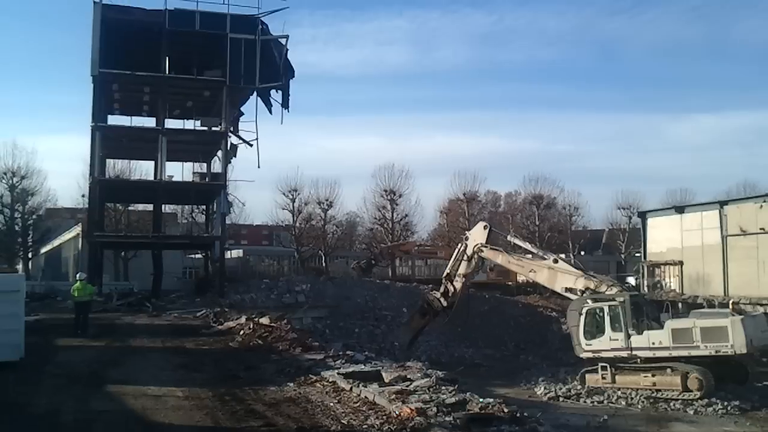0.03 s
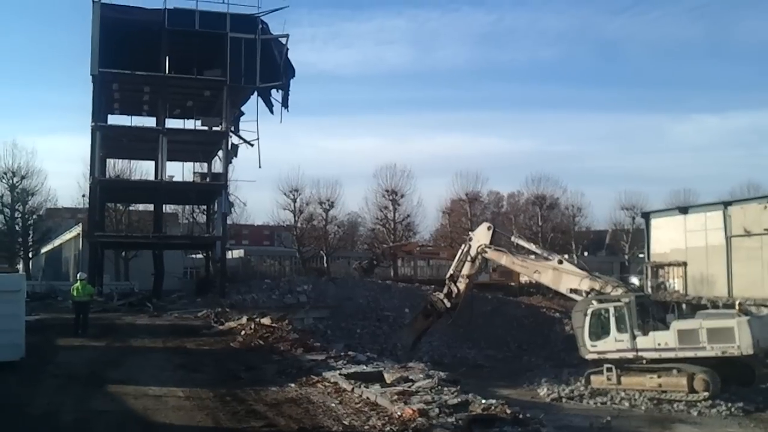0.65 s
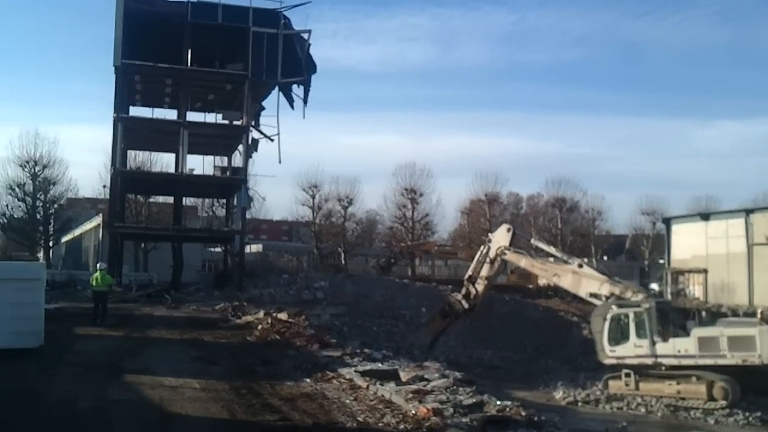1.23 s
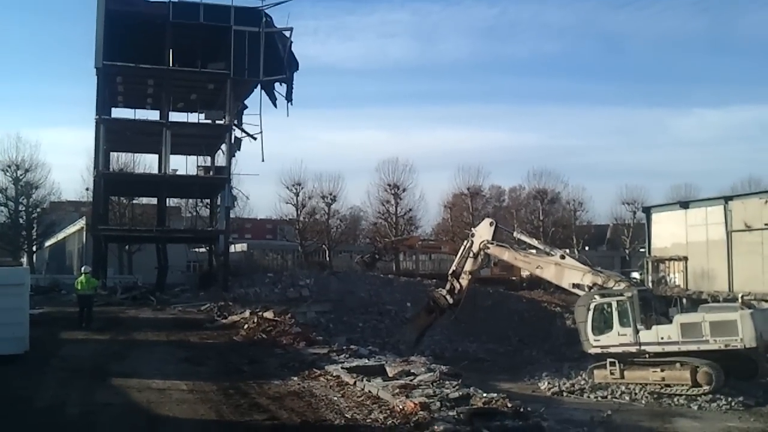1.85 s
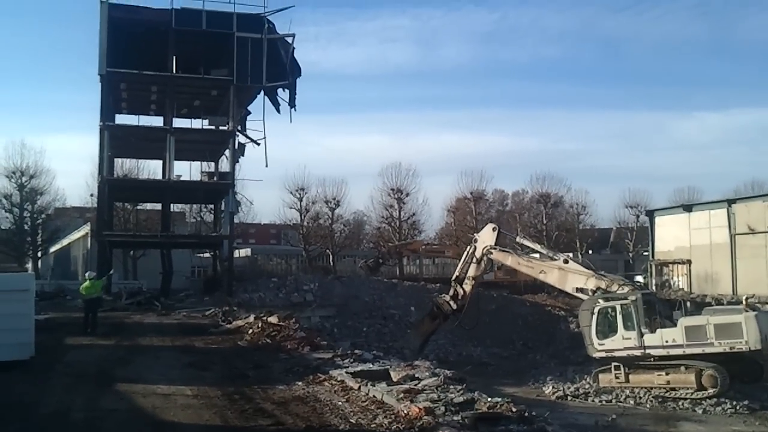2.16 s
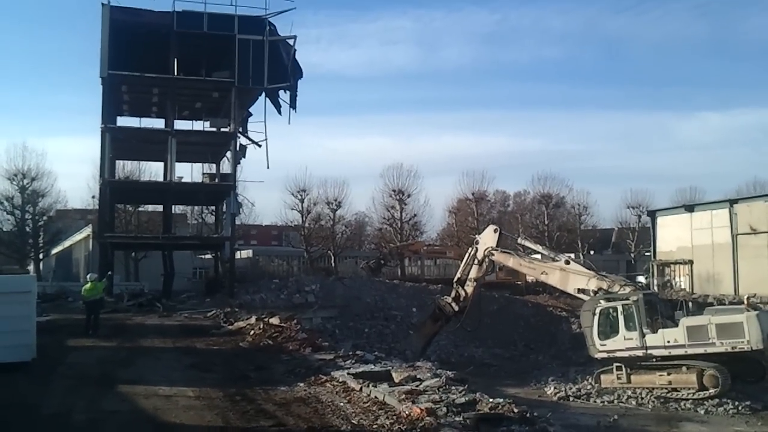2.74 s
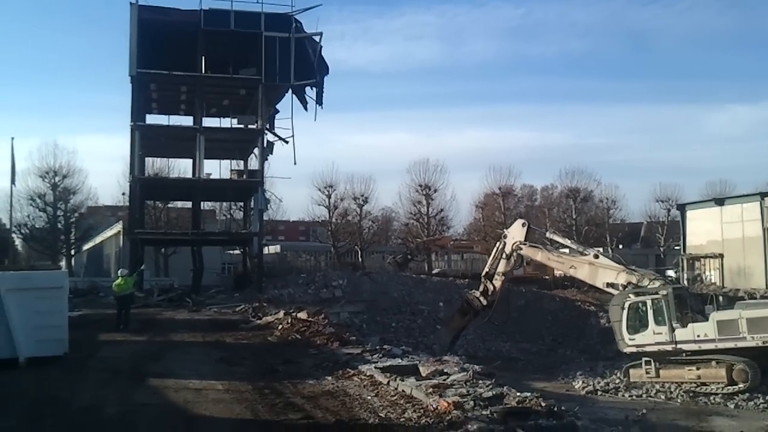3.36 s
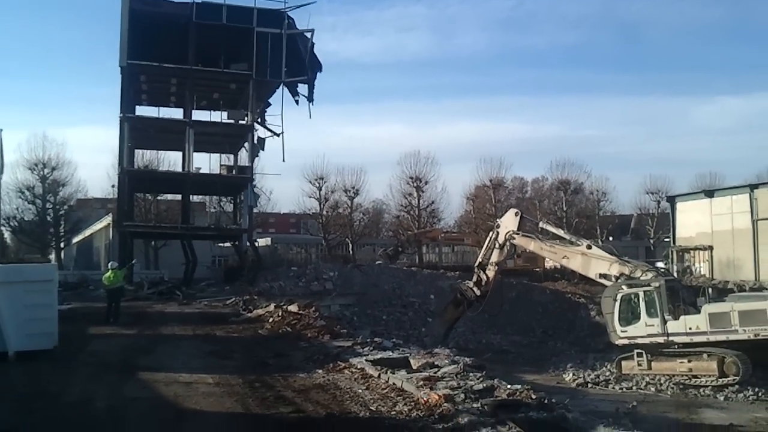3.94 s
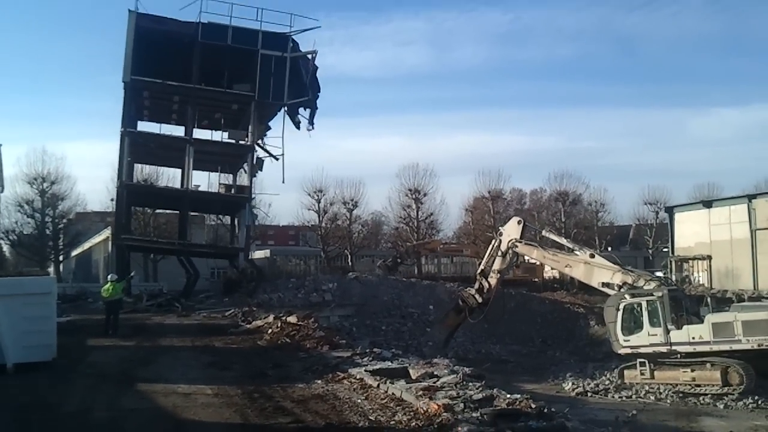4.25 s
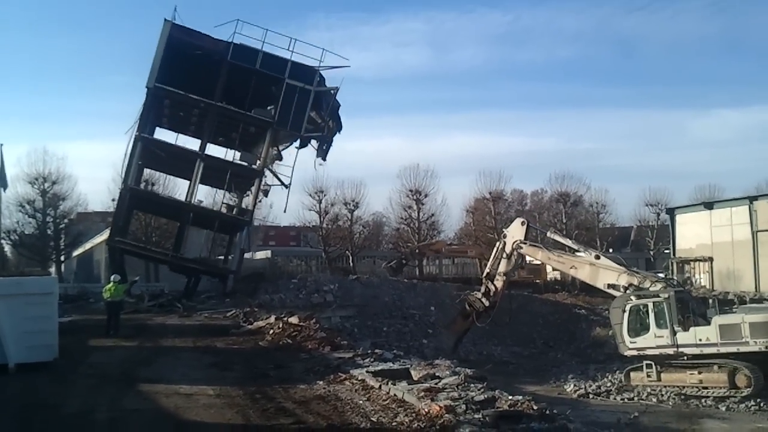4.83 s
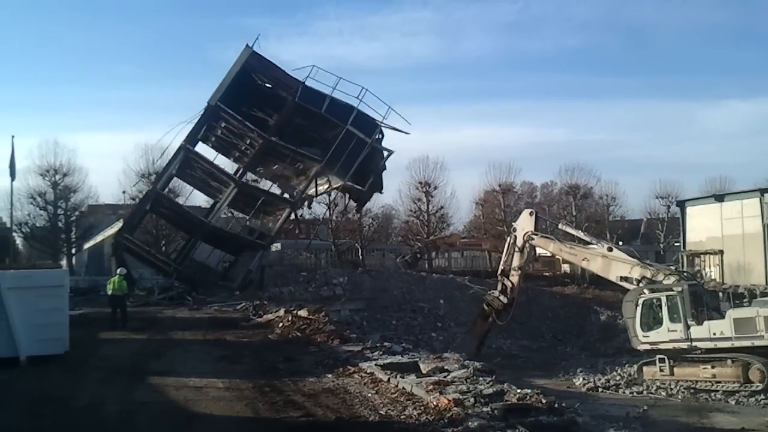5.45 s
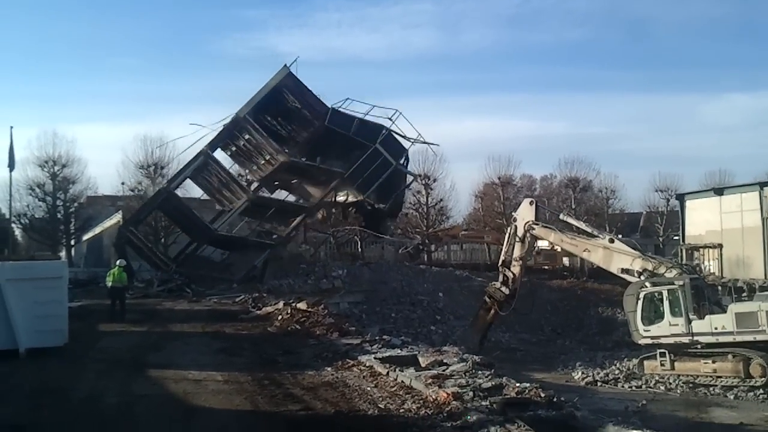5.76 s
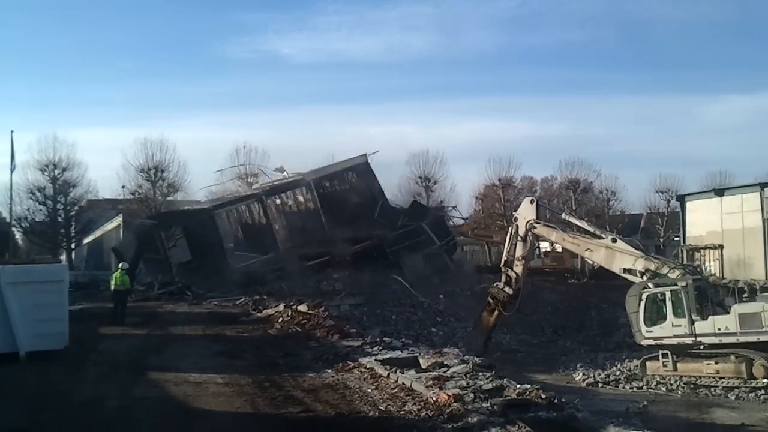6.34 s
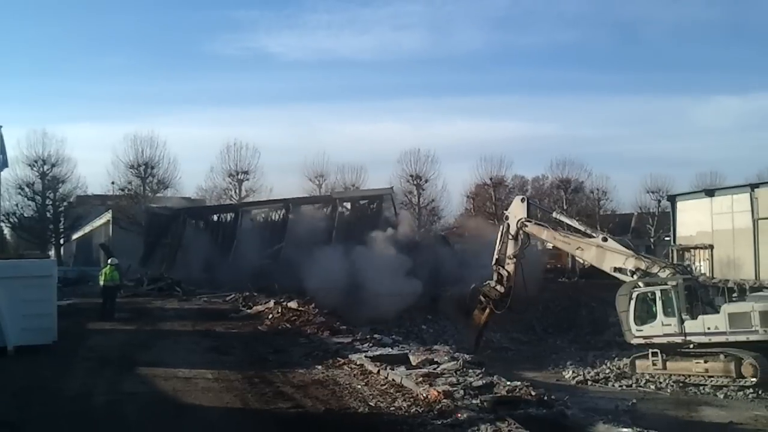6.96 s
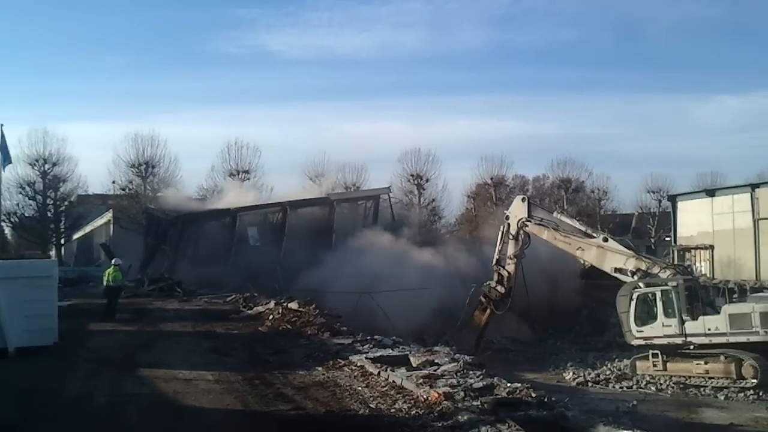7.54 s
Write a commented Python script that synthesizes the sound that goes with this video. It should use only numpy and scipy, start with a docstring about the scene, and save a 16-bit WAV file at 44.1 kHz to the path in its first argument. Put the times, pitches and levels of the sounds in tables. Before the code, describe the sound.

On a demolition site, an excavator's diesel engine throbs and its hydraulic pumps begin to whine. A weakened steel and concrete frame snaps and creaks several times. About halfway through it gives way, groaning as it topples, and the floors thump down in a long roar of rubble, shards and clanging steel. The small microphone sounds narrow and distorts heavily during the crash.

```python
"""A small, narrow-band microphone fades in on a demolition site, where an excavator's diesel throbs.
Its hydraulic pumps start to whine while a weakened steel and concrete frame cracks and creaks.
Near 4 s the legs give way; the frame groans as it topples, and loose steel clangs.
Floors thump down and rubble and shards crash in a long roar that drives the microphone far into clipping."""
import sys
import numpy as np
from scipy import signal
from scipy.fft import rfft, irfft, next_fast_len
from scipy.io import wavfile

SR = 44100
rng = np.random.default_rng(int(sys.argv[2]) if len(sys.argv) > 2 else 0)


def wrap_up_sound(samples):
    """Save the sound to the file named by the first command line argument, as 16-bit audio."""
    columns = np.atleast_2d(samples).T
    # keep every value between -1 and 1, then stretch to whole-number steps
    tamed = np.clip(columns, -1, 1)
    steps = np.round(tamed * 32767).astype(np.int16)
    wavfile.write(sys.argv[1], SR, steps)


N = 339570

# the ring of the steel frame: pitch_hz, width_hz, level_db
FRAME_MODES = [(802, 53, 0.5), (960, 25, -10), (1207, 110, -4), (1400, 110, -2.5), (2487, 160, 4),
               (3070, 55, 2), (3800, 170, 4.5), (4370, 130, 0.5), (5500, 150, -3), (6520, 330, -5.5),
               (6930, 350, -13.5)]
# joints and beams snapping: start_s, level_db, t60_s, thud_relative_db, piece_pitch_hz
FRACTURES = [(1.061, -16.5, 0.39, -7, 4230), (1.302, -10.5, 0.34, 1, 1260), (1.439, -21, 0.32, -13, 5860),
             (2.009, -13.5, 0.075, -16, 7400), (2.144, -14, 0.14, 3.5, 7300), (3.077, -15, .11, -20, 6500),
             (3.843, -17.5, 0.091, -1, 940), (3.903, -15, 0.58, 5, 1400), (4.053, -9, 0.53, -25, 3960),
             (4.477, -6, .2, -9, 1220), (4.551, 3, 0.27, -19, 2430), (5, -3.5, .36, 3.5, 1400),
             (5.236, 3, 0.22, -15, 2770), (5.345, 5, 0.12, -6, 1425), (5.588, -1, .28, -9, 4420)]
# the low weight of heavy slabs: frequency_hz, density_db
SLAB_SPECTRUM = [(15, -37.5), (30, -5.5), (55, -6.5), (80, -4.5), (120, -1.5), (200, 1), (280, -3),
                 (400, -11.5), (1000, -56)]


def collapse(slab_flow, rubble_flow, shard_flow):
    """Slabs rumble, rubble tumbles and shards spray; a rough ring near 1250 Hz colours the roar."""
    # the body of tumbling rubble: frequency_hz, density_db
    rubble_spectrum = [(120, -16), (330, -5.5), (450, -1.5), (580, 0), (900, -1), (1080, -2), (1250, -0.5),
                       (1450, -4), (2000, -6), (3200, -10.5), (8000, -49.5)]
    # the bright spray of small shards: frequency_hz, density_db
    shard_spectrum = [(800, -34), (1900, -14), (2450, -3), (3200, -7.5), (3900, -5), (5000, -8),
                      (6500, -7.5), (8000, -17.5)]
    slabs = colour(hail(rate=340, spread_db=-1.5, t60=0.16), SLAB_SPECTRUM)
    rubble = colour(hail(rate=800, spread_db=3.5, t60=0.22), rubble_spectrum)
    shards = colour(hail(rate=620, spread_db=2.5, t60=0.11), shard_spectrum)
    slabs *= undb(0.32 * walk(11))
    rubble *= undb(1.33 + 0.33 * walk(14))
    mid_ring = undb(-12) * quaver(hz=1252.6, width=130)
    return slab_flow * slabs + rubble_flow * (rubble + mid_ring) + shard_flow * undb(-0.5) * shards


def debris():
    """Envelopes for slabs, rubble and shards: each part that gives way adds a surge of power."""
    # a first chunk drops, the legs burst, the floors and roof land, the wreck settles:
    # start_s, rise_s, level_db, t60_s, slab_relative_db, shard_relative_db
    surges = [(2.15, 0.11, -34.5, 1.0, 17.5, -4), (3.83, 0.1, -16, 3.7, 5, -4.5),
              (4.045, 0.021, -11, 7.4, -0.5, 0), (4.25, .33, -3.5, 2.33, -4.5, -3.5),
              (4.984, 0.017, -3, 3.9, -8, -6), (5.2, 0.19, 2, 3.3, -3, -3.5),
              (5.58, 0.017, 1.5, 4.3, -8, 2), (5.65, 0.32, 4, 11, -5.5, -5),
              (6.4, 0.23, 3, 4.3, -0.5, -2.5), (6.7, 0.48, 0.5, 5.4, -4, 0.5), (7.42, 0.24, -9, 2.2, 7, 8)]
    power = np.zeros((3, N))
    for start, rise, db, t60, slab_db, shard_db in surges:
        power += np.outer(undb([db + slab_db, db, db + shard_db]) ** 2, swell(start, rise, t60) ** 2)
    return np.sqrt(power)


def thumps():
    """A landing mass pushes the ground into a few slow cycles."""
    # heavy masses hitting the ground: start_s, pitch_hz, level_db
    landings = [(4.261, 58.7, -4.5), (4.38, 63, -4), (5.465, 59, 2), (6.83, 48.6, 3), (7.27, 48.7, -0.5)]
    out = np.zeros(N)
    for start, hz, db in landings:
        t = np.maximum(np.arange(N) / SR - start, 0)
        envelope = (1 - np.exp(-t / 0.023)) * decay(t, t60=0.24)
        out += 2 * undb(db) * envelope * np.sin(2 * np.pi * hz * t)
    return out


def cracks():
    """Each fracture is a sharp snap and a dying burst of smaller ones, ringing frame and broken piece."""
    snaps = hail(rate=860, spread_db=6.0, t60=0.049)
    steel = unit(ring(snaps, FRAME_MODES) + undb(11) * snaps)
    thud = colour(rng.standard_normal(N), SLAB_SPECTRUM)
    out, t = np.zeros(N), np.arange(SR // 2) / SR
    for start, db, t60, thud_db, piece_hz in FRACTURES:
        span = slice(int(start * SR), int(start * SR) + len(t))
        # a short crack is bright; each doubling of its length dulls it
        db_per_octave = -1 - 0.87 * np.log2(t60 / 0.093)
        burst = colour(steel[span], [(500, -2 * db_per_octave), (8000, 2 * db_per_octave), (12000, -30)])
        piece = ring(rng.standard_normal(len(t)), [(piece_hz, 0.044 * piece_hz, 0)])
        envelope = decay(t, t60) + 0.3 * np.exp(-t / 0.0021)
        out[span] += undb(db) * envelope * (burst + undb(thud_db) * thud[span] + undb(-5.5) * piece)
    return out


def groans():
    """Folding columns slip and shake a gliding resonance; floors drone below, steel screeches above."""
    # columns buckling: start_s, length_s, start_pitch_hz, glide_hz_per_s, level_db
    buckles = [(4.991, 0.38, 226, 110.5, -4.5), (5.302, .275, 208, 15, 0), (6.547, .22, 195, 3, -4)]
    attack_s = 0.05
    out, t = np.zeros(N), np.arange(N) / SR
    screech = undb(-10) * quaver(hz=1423, width=60)
    for start, length, start_hz, glide, db in buckles:
        hz = start_hz + glide * np.clip(t - start, 0, length)
        bending = swell(start, attack_s, t60=0.12, hold=length - attack_s)
        column = quaver(hz, width=80)
        floors = undb(-6) * quaver(0.58 * hz, width=79)
        out += undb(db) * bending * (column + floors + screech)
    return out


def clangs():
    """A loose piece of steel rattles as it lands and rings with one rough note."""
    # pieces landing: start_s, level_db, pitch_hz, t60_s
    pieces = [(1.673, -20.5, 1300, 0.29), (2.213, -25.5, 3980, .25), (2.242, -25, 4700, .22),
              (2.32, -24, 3870, 0.11), (2.458, -25, 2920, .25), (3.841, -8.5, 950, 0.086),
              (4.156, -8.5, 2480, .4), (6.13, 4, 622, .5), (7.01, 4, 937, 0.95)]
    out, t = np.zeros(N), np.arange(SR // 2) / SR
    for start, db, hz, t60 in pieces:
        span = slice(int(start * SR), int(start * SR) + len(t))
        rattle = rng.standard_normal(len(t))
        note = ring(rattle, [(hz, 0.075 * hz, 0)])
        out[span] += undb(db) * decay(t, t60) * (note + undb(-6) * rattle)
    return out


def creaks(rubble_flow):
    """Joints stick and slip after each crack and under falling rubble; each resonance wavers by itself."""
    tails = [undb(db - 19.5) * swell(start, rise=0.031, t60=3.4) for start, db, *_ in FRACTURES]
    after_cracks = np.sqrt(sum(tail ** 2 for tail in tails))
    under_rubble = undb(-13) * np.tanh(rubble_flow / undb(-5.5))  # levels off in the heaviest fall
    slips = hail(rate=380, spread_db=0.5, t60=0.03)
    steel = sum(undb(db + 3 * walk(9)) * ring(slips, [(hz, width, 0)]) for hz, width, db in FRAME_MODES)
    return np.hypot(after_cracks, under_rubble) * unit(steel)


def excavator():
    """A governed six-cylinder diesel: exhaust tones, pump whine, and noise that throbs with the firings."""
    # exhaust tones, the third being the firing rate: shaft_multiple, level_db
    exhaust_tones = [(1, -32), (2, -23.5), (3, -25.5), (6, -29), (15, -38), (26, -38)]
    # the whine of the hydraulic pumps: pitch_hz, level_db
    pump_tones = [(549, -30.5), (645, -26), (1335, -35)]
    # fan and combustion noise: frequency_hz, density_db
    engine_spectrum = [(20, -17), (60, 4.5), (120, -2.5), (175, 0), (220, -3.5), (295, 2), (370, -6.5),
                       (460, -6.5), (540, 3.5), (680, -7.5), (1050, -10.5), (1280, -6), (2000, -16),
                       (3700, -18), (4800, -22.5), (6500, -20), (8200, -29.5)]
    shaft_hz, pump_on_s, pump_rise_s = 29.58, 1.2, 0.3
    turn = phase(shaft_hz * (1 + 0.00326 * walk(6)))
    exhaust = sum(undb(db + 1.5 * walk(8.9)) * np.sin(multiple * turn + 2 * np.pi * rng.random())
                  for multiple, db in exhaust_tones)
    whine = sum(undb(db + 1.4 * walk(19)) * np.sin(phase(hz * (1 + 0.00367 * walk(18))))
                for hz, db in pump_tones)
    load = undb(0.5) * np.clip((np.arange(N) / SR - pump_on_s) / pump_rise_s, 0, 1)
    noise = colour(hail(rate=1400, spread_db=-1, t60=0.12), engine_spectrum)
    throb = 1 + 0.07 * np.cos(3 * turn)
    return np.sqrt(2) * (exhaust + load * whine) + undb(-17 + 0.5 * walk(7.64)) * throb * noise


def hail(rate, spread_db, t60):
    """Random blows of unequal size, rate a second, each a noise burst that dies in t60 seconds."""
    size = undb(spread_db * np.clip(rng.standard_normal(N), -2, 2))
    blows = (rng.random(N) < rate / SR) * size ** 2
    power = signal.lfilter([1], [1, -decay(1 / SR, t60) ** 2], blows)
    return unit(np.sqrt(power) * rng.standard_normal(N))


def quaver(hz, width):
    """A rough note: a resonance about width Hz wide, shaken at random."""
    angle = phase(hz)
    return unit(walk(width) * np.cos(angle) + walk(width) * np.sin(angle))


def ring(x, modes):
    """Pass x through resonances (pitch_hz, width_hz, level_db), at unit rms."""
    return unit(sum(undb(db) * signal.lfilter(*signal.iirpeak(hz, hz / width, fs=SR), x)
                    for hz, width, db in modes))


def colour(x, points):
    """Equalise x along a curve of (frequency_hz, gain_db) points, at unit rms."""
    hz, db = np.transpose(points)
    size = next_fast_len(len(x))
    bins_hz = np.fft.rfftfreq(size, 1 / SR) + 1
    gain = undb(np.interp(np.log(bins_hz), np.log(hz), db))
    return unit(irfft(rfft(x, size) * gain, size)[:len(x)])


def lowpass(x, hz, order):
    """A steep low-pass without delay."""
    return signal.sosfiltfilt(signal.butter(order, hz, fs=SR, output="sos"), x)


def swell(start, rise, t60, hold=0):
    """An envelope that rises evenly, holds and dies away; all times in seconds."""
    t = np.arange(N) / SR - start
    return np.clip(t / rise, 0, 1) * decay(np.clip(t - rise - hold, 0, 2 * t60), t60)


def decay(t, t60):
    """A tail that falls 60 dB in t60 seconds."""
    return undb(-60 * t / t60)


def walk(rate):
    """Smooth random wandering, rate steps a second, with a spread near 1."""
    points = signal.resample_poly(rng.standard_normal(2048), 8, 1)
    return np.interp(np.arange(N) / SR * rate, np.arange(len(points)) / 8, points)


def phase(hz):
    """The running angle of a steady or moving pitch, in radians."""
    return 2 * np.pi * np.cumsum(hz * np.ones(N)) / SR


def undb(db):
    """Decibels to gain."""
    return 10 ** (np.asarray(db) / 20)


def unit(x):
    """Scale to an rms of 1."""
    return x / np.sqrt(np.mean(x ** 2) + 1e-18)


def scene():
    """The machine, the cracking frame and its fall, in mono."""
    slab_flow, rubble_flow, shard_flow = debris()
    frame = creaks(rubble_flow) + cracks() + clangs() + groans()
    return (excavator() + frame + thumps() + collapse(slab_flow, rubble_flow, shard_flow))[None]


def record(dry):
    """The narrow-band input fades in and clips; its band limit overshoots, and the output clips again."""
    opens_s, settle_s, opening_db = 0.7404, 0.18, -20
    band_hz, input_db, input_clip, output_clip = 8390, -4, 0.73, 0.71
    t = np.arange(N) / SR - opens_s
    fade = (t > 0) * (1 - (1 - undb(opening_db)) * np.exp(-np.maximum(t, 0) / settle_s))
    narrow = lowpass(dry * fade, band_hz, order=8) * undb(input_db)
    overloaded = np.clip(narrow, -input_clip, input_clip)
    flattened = np.clip(lowpass(overloaded, band_hz, order=18), -output_clip, output_clip)
    return lowpass(flattened, hz=15700, order=40)


dry = scene()
out = record(dry)
wrap_up_sound(out)
```